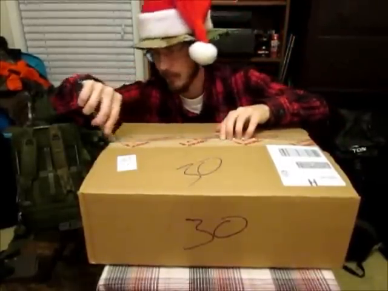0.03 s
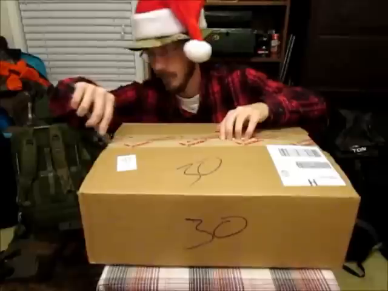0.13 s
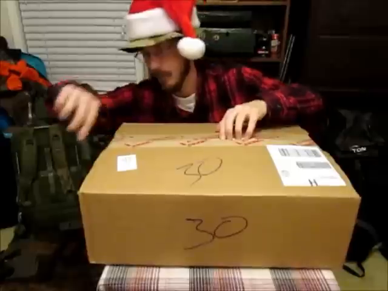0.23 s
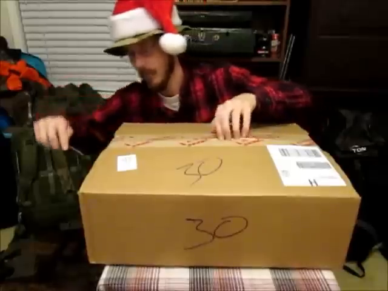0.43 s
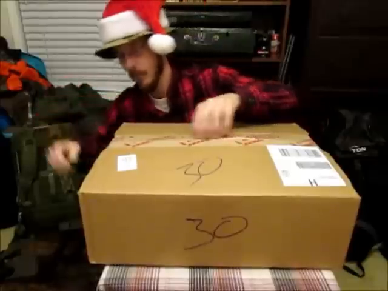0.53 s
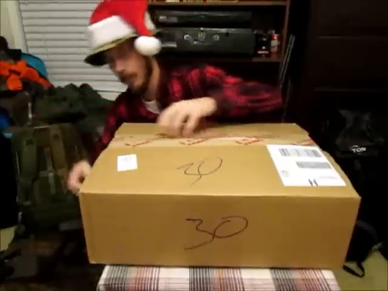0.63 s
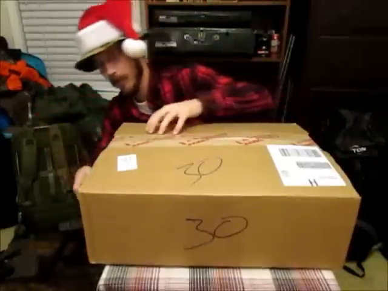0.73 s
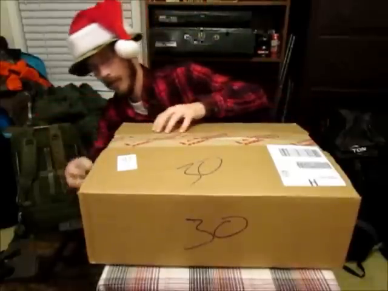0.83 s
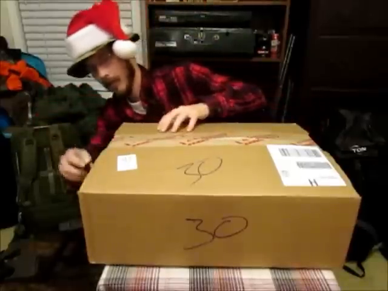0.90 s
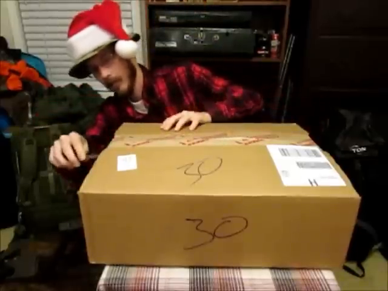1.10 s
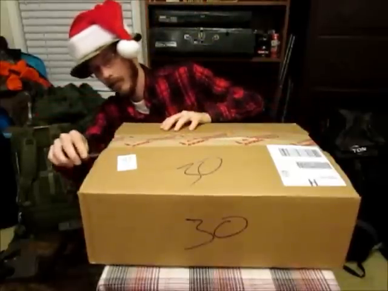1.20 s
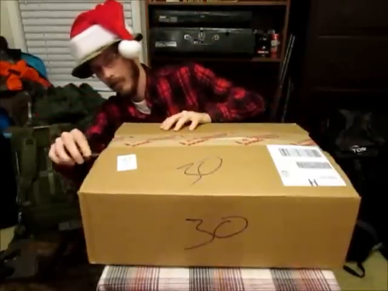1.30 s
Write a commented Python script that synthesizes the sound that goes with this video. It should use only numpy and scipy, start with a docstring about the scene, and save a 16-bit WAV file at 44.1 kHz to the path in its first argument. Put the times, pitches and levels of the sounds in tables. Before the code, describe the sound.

A blade rasps through tape on a large cardboard box and breaks free with a loud snap and hollow thump; soft flap scuffs, a hand slide and dull double tap follow, close up in a small room.

```python
"""A blade rasps through the tape on a cardboard box, then bursts out with a snap and a hollow thump.
A flap dragging, a short scuff, a hand sliding over the lid and a dull double knock follow, then the
blade squeaks into the next seam. Rasp and rubbing are streams of tiny random clicks, snaps and crushed
board are dying noise, and box and side wall ring as sets of fading tones. Squeaks are wavering sines.
A small furnished room adds short reflections, with soft noise and a faint whine behind."""
import sys
import numpy as np
from scipy import signal
from scipy.fft import rfft, irfft
from scipy.io import wavfile

SR = 44100
rng = np.random.default_rng(int(sys.argv[2]) if len(sys.argv) > 2 else 0)


def wav_out(sig):
    """Save sig, one row per channel (or a flat mono array), as 16-bit PCM at SR to the path in sys.argv[1]."""
    wavfile.write(sys.argv[1], SR, np.round(np.clip(np.atleast_2d(sig).T, -1, 1) * 32767).astype(np.int16))


N = 59535
T = np.arange(N) / SR   # time in seconds

# tones the cardboard box rings with: pitch_hz, relative_level_db, t60_s (time to fade by 60 dB)
BOX_TONES = [(99.9, -3, 0.105), (194, -3.5, 0.063), (308.9, 0, 0.1183), (345.7, -5.5, 0.13),
             (412, -5.5, 0.0625), (476.3, 2.5, 0.0916), (517.95, -1, 0.1104), (596.3, -5, 0.083),
             (640.8, -6, 0.089), (742, -6, 0.075), (879.4, -8, 0.085), (945.1, -10, 0.0785),
             (1132.8, -15.5, 0.0805), (1620, -11, 0.076), (1740, -8, 0.076)]


def cut():
    """The tape tears in tiny slips that rasp and shake the box; now and then it snaps."""
    # drag of the blade in the tape, before colouring: time_s, level_db
    drag = [(0, -46), (.025, -43), (.055, -43), (.07, -40.5), (.088, -45), (.122, -37.5), (.137, -48),
            (.172, -49.5), (.18, -40), (.207, -45), (.224, -35.5), (.26, -36), (.279, -43.5), (.303, -67.5),
            (.33, -100)]
    # tone colour of the rasp: frequency_hz, relative_level_db
    rasp_colour = [(40, -26.5), (85, -5.5), (170, -6), (240, -11), (400, -6.5), (600, 3), (950, -5),
                   (1350, -4), (1650, -7.5), (2000, -4.5), (2600, -14.5), (3500, -8), (4700, -13.5),
                   (6000, -17), (9000, -18), (12500, -24), (15500, -39)]
    # the tape snaps: time_s, level_db
    snap_times = [(0.071, -21.5), (.111, -21), (.121, -19), (.2602, -2.5), (0.2666, -8), (0.2707, -12.5),
                  (.287, -17)]
    # tone colour of the snaps: frequency_hz, relative_level_db
    snap_colour = [(200, -20.5), (1000, -3), (2000, -0.5), (3600, 1), (5500, -7), (8000, -17),
                   (15000, -34.5)]
    slips_per_s, slip_spread_db = 8000, 2
    box_db, snap_t60_s = -9, 0.0084   # the box level is relative to the tearing

    drag_s, drag_db = np.transpose(drag)
    tearing = slips(slips_per_s, slip_spread_db) * from_db(np.interp(T, drag_s, drag_db))
    rasp = colour(tearing, rasp_colour) * from_db(4)
    shaken_box = edge(ring(tearing, BOX_TONES), 283, "high")
    body = rms_one(shaken_box) * np.std(tearing) * from_db(box_db)
    snaps = sum(from_db(db) * burst(s, snap_t60_s) for s, db in snap_times)
    return rasp + body + colour(snaps, snap_colour)


def jolts():
    """Each blow rings the box and crushes the board briefly."""
    # blows to the box: time_s, level_db, dull_above_hz, thin_below_hz
    blows = [(.111, -42, 3000, 400), (.123, -37.5, 140, 60), (.184, -35, 2200, 596),
             (.2165, -34.5, 1200, 300), (.228, -32.5, 1790, 128.4), (.2615, -16.5, 1008, 75.8),
             (0.2677, -24.5, 904, 262.5), (0.2839, -24, 840, 257), (1.2776, -41.5, 375, 125)]
    # tone colour of the crushed board: frequency_hz, relative_level_db
    crush_colour = [(45, -29.5), (90, 3.5), (200, 0.5), (450, 2.5), (800, 2.5), (1200, -1), (1800, 1.5),
                    (3000, -7.5), (5000, -19.5), (15000, -36.5)]
    crush_db, crush_t60_s = 22, 0.0535   # level on top of each blow's own

    out = 0
    for s, db, dull_hz, thin_hz in blows:
        ringing = ring(click(s, db), BOX_TONES)
        crush = from_db(db + crush_db) * colour(burst(s, crush_t60_s), crush_colour)
        dulled = edge(ringing + crush, dull_hz, "low")
        out = out + edge(dulled, thin_hz, "high")
    return out


def knock():
    """A light, dull double knock rings the side wall and crushes its board."""
    # the side wall is touched and touched again: time_s, level_db
    touches = [(1.1635, -36), (1.1765, -43)]
    # tones of the side wall: pitch_hz, relative_level_db, t60_s
    wall_tones = [(115.3, -10.5, 0.185), (190.7, -5.5, .14), (477.2, -7.5, 0.0645), (567.2, -0.5, 0.123),
                  (619.5, -3, 0.158), (789, -5, .05), (959, -4, 0.053), (1755, -15.5, 0.106),
                  (2326, -21, .04)]
    # tone colour of the crushed board: frequency_hz, relative_level_db
    crush_colour = [(50, -37), (90, -10.5), (190, 5), (330, -9), (580, 2.5), (800, -2), (1020, -2.5),
                    (1350, -19), (1800, -11), (2700, -27.5), (6000, -35.5), (15000, -52.5)]
    crush_db, crush_t60_s = 27.5, 0.1146   # level on top of each touch's own

    taps = sum(click(s, db) for s, db in touches)
    crush = sum(from_db(db + crush_db) * burst(s, crush_t60_s) for s, db in touches)
    return ring(taps, wall_tones) + colour(crush, crush_colour)


def rubs():
    """Four rubbing strokes: a dragging flap, the scuff, the sliding hand and the entering blade."""
    # strokes: start_s, attack_s, hold_s, release_s (time to fall by 40 dB), level_db
    flap = (0.4642, 0.0072, 0.0715, 0.0757, -47.5)
    scuff = (0.5261, 0.0084, 0.0057, 0.1059, -46.5)
    palm = (0.79, 0.0453, 0.1655, 0.2549, -52)
    entry = (1.26, 0.0347, 0.02, .3, -48)
    # tone colours of the strokes: frequency_hz, relative_level_db
    flap_colour = [(60, -22.5), (200, -5), (450, -0.5), (850, 0), (1300, -2.5), (2200, -10.5),
                   (6000, -17.5), (15000, -33.5)]
    scuff_colour = [(60, -20.5), (160, 0), (900, -1.5), (2200, -4), (4500, -1.5), (8000, -11.5),
                    (15000, -26)]
    palm_colour = [(70, -10.5), (150, -14.5), (500, -7), (1000, -3.5), (2100, -0.5), (3500, -2.5),
                   (7000, -8), (10000, -8), (15000, -19.5)]
    entry_colour = [(60, -10), (160, 7.5), (300, -1), (550, 6), (1100, -7), (1500, -7.5), (1900, -1.5),
                    (2600, -9), (4500, -8.5), (8000, -16.5), (15000, -29.5)]

    # the last number is friction grains per second
    hands = rub(flap, flap_colour, 3000) + rub(scuff, scuff_colour, 3000) + rub(palm, palm_colour, 20000)
    return hands + rub(entry, entry_colour, 9000)


def rub(stroke, spectrum, grains_per_s):
    """Fine friction grains that swell, hold and die away."""
    start, attack, hold, release, db = stroke
    rise = np.clip((T - start) / attack, 0, 1)
    fall = from_db(-40 * np.maximum(T - start - attack - hold, 0) / release)
    return colour(slips(grains_per_s, 2.51) * rise * fall * from_db(db), spectrum)


def squeaks():
    """The board groans or squeaks under friction: short tones of wavering pitch and level."""
    # tones: start_s, length_s, pitch_hz, pitch_waver_hz (rms), level_db (peak, before flutter)
    tones = [(0.48, 0.1265, 442, 12, -43.5), (0.524, 0.0892, 276.8, 12, -48),
             (0.879, 0.078, 474, 9.3, -55.5), (1.253, 0.0258, 1898, 180, -45)]
    out = 0
    for s, length, hz, waver_hz, db in tones:
        waver = rms_one(edge(rng.standard_normal(N), 59.82, "low"))
        flutter = from_db(3.33 * rms_one(edge(rng.standard_normal(N), 72, "low")))
        swell = np.sin(np.pi * np.clip((T - s) / length, 0, 1))
        phase = 2 * np.pi * np.cumsum(hz + waver_hz * waver) / SR
        out = out + from_db(db) * swell * flutter * np.sin(phase)
    return out


def room(x):
    """Dense short reflections; the treble dies first."""
    t60_s, treble_t60_s, split_hz = 0.2672, 0.2323, 1987
    level_db, gap_s = -5.5, .004   # the gap is the wait before the first reflection
    low_hz = 170   # the reflections carry little below this

    low_tail = edge(burst(gap_s, t60_s), split_hz, "low")
    treble_tail = edge(burst(gap_s, treble_t60_s), split_hz, "high")
    reflections = signal.fftconvolve(edge(x, low_hz, "high"), low_tail + treble_tail)[:N]
    return x + from_db(level_db) * reflections


def background():
    """Steady room noise and a faint electrical whine."""
    # tone colour of the room noise: frequency_hz, relative_level_db
    noise_colour = [(20, -13), (70, -4), (200, -3.5), (450, -2.5), (800, -5.5), (1300, -9.5), (2900, -15.5),
                    (7000, -21.5), (12500, -26), (15500, -36)]
    noise_db, whine_hz, whine_db = -54, 11800, -76.5   # levels are rms

    noise = from_db(noise_db) * colour(rng.standard_normal(N), noise_colour)
    whine = from_db(whine_db) * np.sqrt(2) * np.sin(2 * np.pi * whine_hz * T)
    return noise + whine


def slips(per_s, spread_db):
    """Stick-slip: random tiny clicks of uneven size and either sign, at unit rms."""
    sizes = from_db(spread_db * np.minimum(rng.exponential(1, N), 5))
    signed_sizes = sizes * rng.choice([-1, 1], N)
    return rms_one(signed_sizes * (rng.random(N) < per_s / SR))


def click(s, db):
    """One impulse, a single sample long."""
    return from_db(db) * (np.arange(N) == int(s * SR))


def burst(s, t60):
    """Noise of unit energy that starts at once and fades by 60 dB in t60 seconds."""
    fade = from_db(-60 * np.maximum(T - s, 0) / t60)
    noise = rng.standard_normal(N) * (T >= s) * fade
    return rms_one(noise) / np.sqrt(N)


def ring(force, modes):
    """Damped tones side by side, all set ringing by the same force."""
    out = 0
    for hz, db, t60 in modes:
        decay = np.exp(-np.log(1000) / (t60 * SR))   # gain kept per sample
        turn = 2 * np.pi * hz / SR   # phase step per sample
        feedback = [1, -2 * decay * np.cos(turn), decay * decay]
        out = out + from_db(db) * signal.lfilter([0, np.sin(turn)], feedback, force + 1e-18)
    return out


def colour(x, points):
    """Filter of unit power gain that follows (Hz, dB) points and never sounds ahead of its input."""
    hz, db = np.transpose(points)
    bins_hz = np.arange(N + 1) * SR / (2 * N)
    gain = rms_one(from_db(np.interp(np.log(bins_hz + 1), np.log(hz), db)))
    # folding the cepstrum gives the filter its minimum phase
    cepstrum = irfft(np.log(gain))
    cepstrum[1:N] *= 2
    cepstrum[N + 1:] = 0
    return irfft(rfft(x, 2 * N) * np.exp(rfft(cepstrum)))[:N]


def edge(x, hz, kind, order=2):
    """Low-pass or high-pass filter."""
    sections = signal.butter(order, np.clip(hz, 10, SR / 2 - 999), kind, fs=SR, output="sos")
    return signal.sosfilt(sections, x + 1e-18)


def rms_one(x):
    """Scale to unit rms."""
    return x / np.sqrt(np.mean(x ** 2) + 1e-20)


def from_db(db):
    """Decibels to gain."""
    return 10 ** (np.asarray(db) / 20)


def scene():
    """Knife, hands and box in the room, over the background."""
    sources = cut() + jolts() + knock() + rubs() + squeaks()
    return (room(edge(sources, 65, "high")) + background())[None]


def record(dry):
    """The microphone loses the deep bass; the top is cut."""
    cutoff_hz = 15800
    steep_cut = signal.ellip(12, .1, 90, cutoff_hz, fs=SR, output="sos")
    return signal.sosfilt(steep_cut, edge(dry, 25, "high"))


dry = scene()
out = record(dry)
wav_out(out)
```